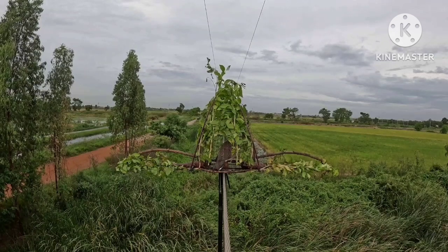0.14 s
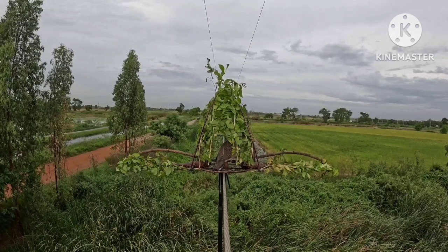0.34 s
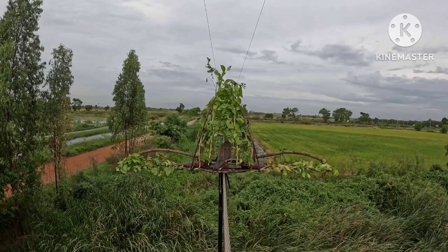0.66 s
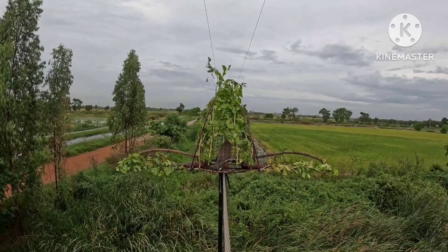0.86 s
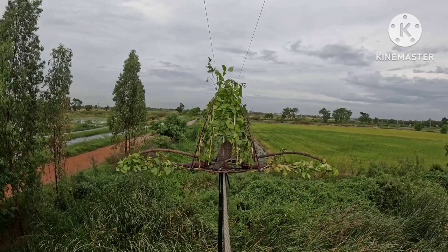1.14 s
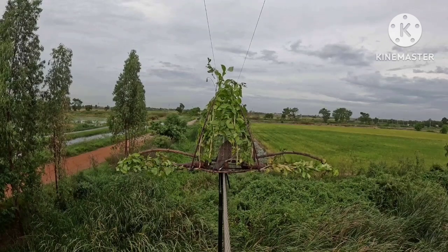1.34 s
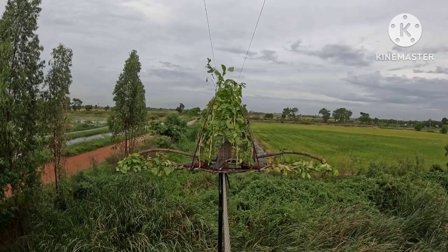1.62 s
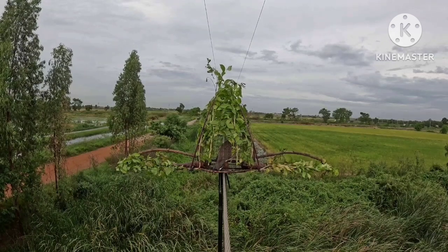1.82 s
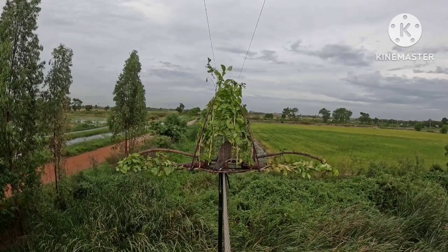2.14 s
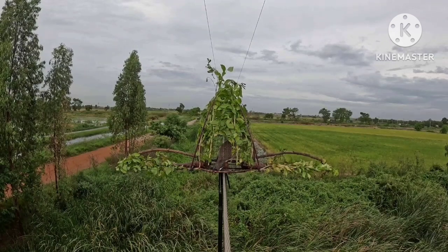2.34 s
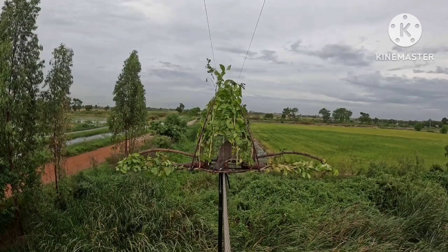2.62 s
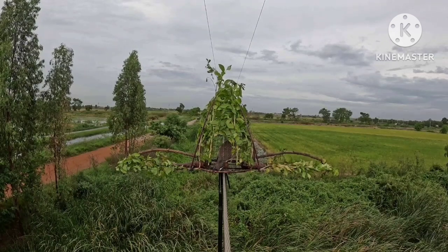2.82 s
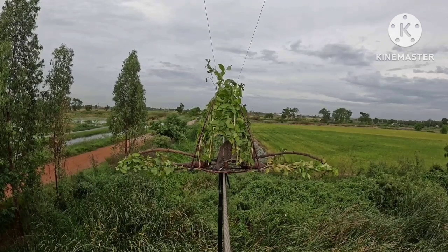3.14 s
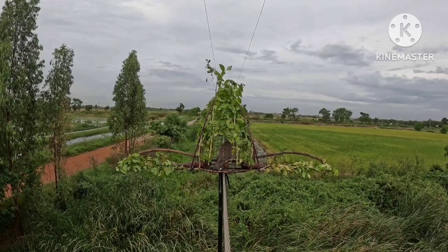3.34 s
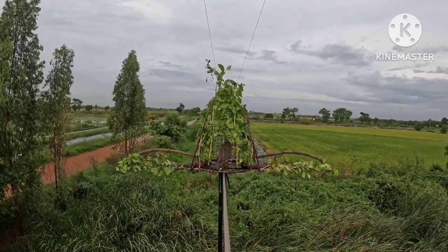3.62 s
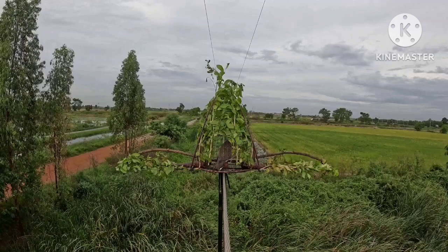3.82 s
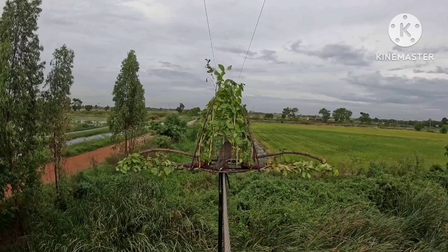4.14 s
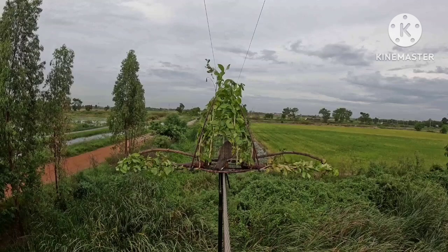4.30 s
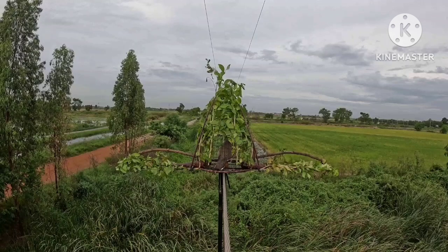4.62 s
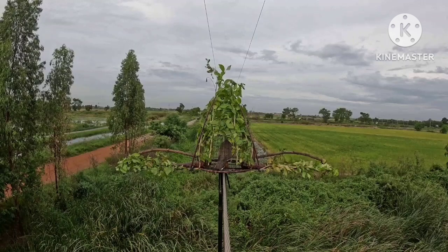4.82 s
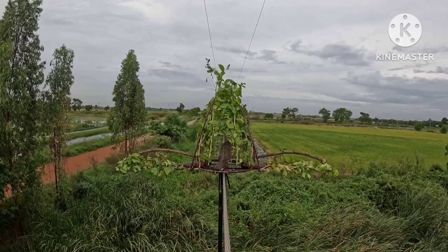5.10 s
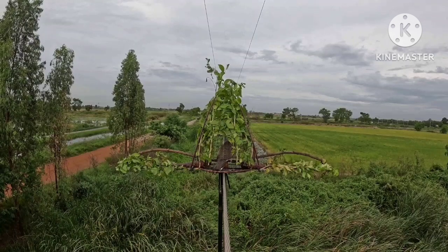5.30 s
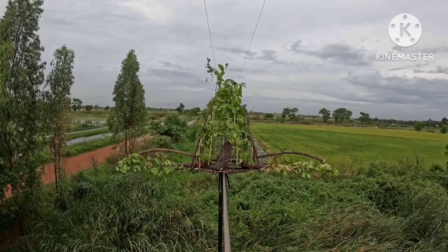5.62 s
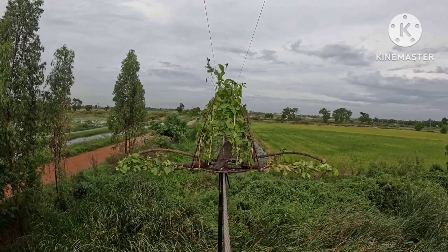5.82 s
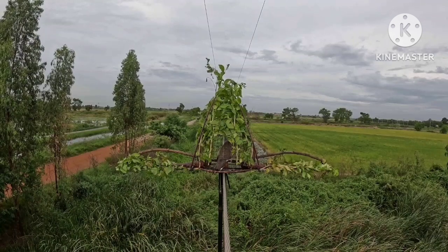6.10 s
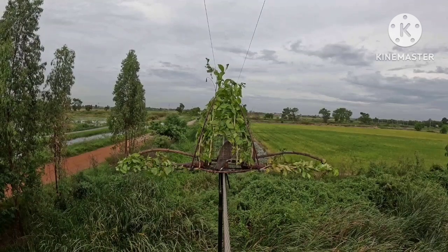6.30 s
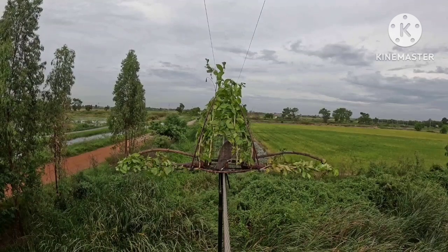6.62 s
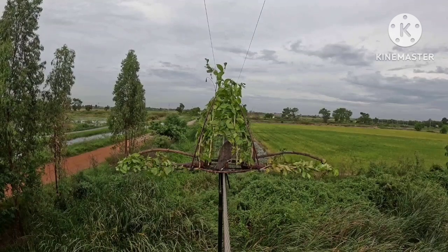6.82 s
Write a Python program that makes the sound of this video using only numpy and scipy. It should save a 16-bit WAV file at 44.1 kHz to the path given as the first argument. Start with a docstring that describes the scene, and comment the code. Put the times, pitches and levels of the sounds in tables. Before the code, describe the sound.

Outdoors at the edge of open farmland, wind rumbles and thumps unevenly against the microphone. From about 1.6 s a close dove gives a pip, an arched hollow coo, a quickening roll that sinks away, and a low closing coo. Buffets crowd together near 4 s, then ease. At 5.5 s the dove repeats its pip, coo and roll. Faint insects, small birds and a distant motor hum continue behind.

```python
"""Gusts buffet the microphone at the edge of open fields, over insects, small birds and a motor's hum.
At 1.6 s a spotted dove close by sounds a short pip, an arched coo, a quickening, sinking roll, then a
low closing coo; buffets crowd from 3.5 s to 4.2 s and ease; at 5.5 s the dove repeats pip, coo and roll.
The dove is a nearly pure tone whose level is shaped along with its pitch; wind, field and insect chorus
are filtered noise, the hum is a set of wavering sines, and the birds are gliding tones."""
import sys
import numpy as np
from scipy import signal
from scipy.fft import rfft, irfft, next_fast_len
from scipy.io import wavfile
from scipy.ndimage import uniform_filter1d

SR = 44100
rng = np.random.default_rng(int(sys.argv[2]) if len(sys.argv) > 2 else 0)


def transcribe(signal):
    """Save signal, clipped to [-1, 1], as a 16-bit WAV file at the path in sys.argv[1]."""
    frames = np.atleast_2d(signal).T
    limited = np.clip(frames, -1, 1)
    pcm = np.round(limited * 32767).astype(np.int16)
    wavfile.write(sys.argv[1], SR, pcm)


N = 306476
TIME = np.arange(N) / SR  # s


def gain_of(db):
    """Logarithmic level: 20 dB is a tenfold amplitude."""
    return 10 ** (np.asarray(db) / 20)


def evened(x):
    """Normalisation of power: scales to an rms of 1."""
    return x / np.sqrt(np.mean(x ** 2) + 1e-20)


def read(points, hz):
    """Interpolation of (frequency, value) points along a log-frequency axis."""
    f, value = np.transpose(points)
    return np.interp(np.log(hz + 1), np.log(f + 1), value)


def add(mix, start_s, sound):
    """Superposition: adds a sound into the mix in place."""
    part = mix[max(round(start_s * SR), 0):][:len(sound)]
    part += sound[:len(part)]


def noise(spectrum):
    """Spectral shaping of white noise, to an rms of 1."""
    size = next_fast_len(N)
    shape = gain_of(read(spectrum, np.fft.rfftfreq(size, 1 / SR)))
    white = rfft(rng.standard_normal(size))
    return evened(irfft(white * shape, size)[:N])


def drift(rate_hz):
    """Low-pass random modulation: noise of rms 1 under a Gaussian roll-off set by the rate."""
    size = next_fast_len(N)
    fade = np.exp(-(np.fft.rfftfreq(size, 1 / SR) / rate_hz) ** 2)
    return evened(irfft(rfft(rng.standard_normal(size)) * fade, size)[:N])


def placed(x, left_db):
    """Interaural level difference: the left side exceeds the right by left_db."""
    return x * gain_of([[left_db / 2], [-left_db / 2]])


SCATTER_T60_S = .3  # time for the scatter to fall by 60 dB


def outdoors(x, t60_s, first_s):
    """Diffuse scattering from trees and ground: sparse taps that die away, other ones on each side."""
    t = np.arange(SR // 2) / SR
    taps = rng.standard_normal((2, len(t))) * (rng.random((2, len(t))) < .05)
    taps *= (t > first_s) * gain_of(-60 * t / t60_s)
    return signal.oaconvolve(x[None], taps / np.linalg.norm(taps[0]), axes=1)[:, :N]


def ports(pair, lead):
    """Interchannel phase: two microphone ports hear the same sound slightly out of step."""
    size = next_fast_len(N)
    turn = np.exp(.5j * read(lead, np.fft.rfftfreq(size, 1 / SR)))
    return irfft(rfft(pair, size) * np.array([turn, turn.conj()]), size)[:, :N]


# lines of the distant motor's hum: pitch_hz [Hz], level_db [dB rms, before the waver]
HUM_LINES = [(49.8, -40.5), (63.3, -45), (99.8, -57), (183, -52.5), (353, -69)]


def motor(waver_db=1.25, wander_rad=.097):
    """Additive synthesis: low lines waver in level and phase on their way across the fields."""
    hum = np.zeros(N)
    for pitch_hz, level_db in HUM_LINES:
        level = gain_of(level_db + waver_db * drift(2))
        hum += level * np.sin(2 * np.pi * pitch_hz * TIME + wander_rad * drift(2))
    return np.sqrt(2) * hum


# spectrum of the far countryside: frequency_hz [Hz], density_db [relative dB per Hz]
FIELD_SPECTRUM = [(8, -2.5), (25, 3.5), (70, -1), (130, -6), (200, -13), (320, -15.5), (500, -13),
                  (800, -7), (1400, -12.5), (2400, -26), (3300, -31.3), (4900, -35), (6200, -39.5),
                  (9000, -39.5), (10500, -56.5), (15000, -71.5)]
# course of the wash: time_s [s], level_db [dB, before the wash trim]
FIELD_COURSE = [(0, -45.5), (.7, -43.5), (1.1, -41), (1.4, -42), (1.8, -44.3), (2.6, -43), (3.2, -41.5),
                (3.8, -42.5), (4.4, -42.5), (5.3, -43), (6.3, -41.5), (6.95, -41.5)]
# the field between the ears: frequency_hz [Hz], likeness [correlation], left_over_right_db [dB]
FIELD_WIDTH = [(60, .93, 0), (330, .95, 0), (1000, .92, -2.5), (2300, .76, -2.3), (4600, .6, 0),
               (7200, .7, 2), (9500, .6, 1.5)]


def field(patchy_db=1.3, wash_db=.2):
    """Partially coherent noise: far traffic and leaves as a stereo wash with drifting spectral patches."""
    frames, hz = N // 512 + 5, np.fft.rfftfreq(2048, 1 / SR)
    a, b, c, d, patches = rng.standard_normal((5, frames, len(hz)))
    patches = uniform_filter1d(uniform_filter1d(patches, size=10, axis=0), size=18, axis=1)
    patches = evened(patches) * (hz > 2500) * (hz < 6500)
    width = np.array(FIELD_WIDTH)
    likeness = np.clip(read(width[:, :2], hz), -1, 1)
    left_db = read(width[:, ::2], hz)
    # the right side shares only the coherent part of the left
    left = a + 1j * b
    right = likeness * left + np.sqrt(1 - likeness ** 2) * (c + 1j * d)
    pair = np.array([left * gain_of(left_db / 2), right * gain_of(-left_db / 2)])
    pair = pair * gain_of(read(FIELD_SPECTRUM, hz) + patchy_db * patches)
    wash = signal.istft(pair.transpose(0, 2, 1), nperseg=2048, noverlap=1536)[1][:, :N]
    return gain_of(np.interp(TIME, *np.transpose(FIELD_COURSE)) + wash_db) * evened(wash)


# spectrum of the steady insect chorus: frequency_hz [Hz], density_db [relative dB per Hz]
CHORUS_SPECTRUM = [(6000, -47), (6650, -21.5), (6900, -6), (7030, -4.5), (7150, -3.5), (7300, 0),
                   (7450, -5.5), (7650, -24.5), (8300, -52)]
# bouts of one nearer insect: start_s [s], length_s [s]
BUZZ_BOUTS = [(0, 0.12), (0.207, 0.23), (1.987, .18), (2.294, .2), (2.612, 0.22), (4.007, 0.16),
              (4.276, 0.19), (4.578, 0.25), (6.194, .17), (6.49, .18), (6.85, .15)]


def insects(chorus_db=-59.3, buzz_db=-64, buzz_hz=7600, strokes_hz=105):
    """Narrow-band noise and amplitude modulation: a shrill chorus, and one insect's wing-stroke buzzes."""
    chorus = noise(CHORUS_SPECTRUM) * gain_of(chorus_db + 1.0 * drift(70))
    bouts = np.zeros(N)
    for start_s, length_s in BUZZ_BOUTS:
        add(bouts, start_s, signal.windows.tukey(round(length_s * SR), .6))
    strokes = (1 + np.sin(2 * np.pi * strokes_hz * TIME)) * drift(210)
    buzz = gain_of(buzz_db) * bouts * evened(strokes * np.sin(2 * np.pi * buzz_hz * TIME))
    # independent noise on each side: insects all around
    spread = gain_of(chorus_db - 5.5) * np.array([noise(CHORUS_SPECTRUM), noise(CHORUS_SPECTRUM)])
    return placed(chorus, left_db=2.5) + spread + placed(buzz, left_db=5.5)


CHIP_S, CHIP_FALL = .028, .25  # length in s; depth of the dive as a share of the pitch


def chip(hz, bend):
    """Frequency glide: one quick whistle starts level and soft, then swells as it dives."""
    u = np.linspace(0, 1, round(CHIP_S * SR))
    pitch_hz = hz * (1 + CHIP_FALL * bend * (.3 - u ** 2.1))
    return np.sin(np.pi * u ** 1.4) ** 1.4 * np.sin(2 * np.pi * np.cumsum(pitch_hz) / SR)


RASP_ATTACK_S = .003
STUTTER_HZ, STUTTER_SWEEP = 130, .3  # rate of the tiny falling chirps; sweep as a share of the pitch


def rasp_syllable(start_s, length_s, first_hz, last_hz, roughness, roughening):
    """Sawtooth frequency modulation: a harsh syllable is a string of tiny falling chirps."""
    t = np.arange(start_s, start_s + length_s, 1 / SR)
    sweeps = 1 + STUTTER_SWEEP * roughness * (.5 - (t - start_s) * STUTTER_HZ % 1)
    pitch_hz = np.linspace(first_hz, last_hz, len(t)) * sweeps
    tone = np.sin(2 * np.pi * np.cumsum(pitch_hz) / SR)
    envelope = np.minimum((t - start_s) / RASP_ATTACK_S, 1) * (1 - ((t - start_s) / length_s) ** 2)
    grain = 1 - roughness + roughness * np.interp(t, TIME, roughening)
    return envelope * evened(tone * grain)


# runs of falling chips from one small bird: start_s [s], chips [count]
CHIP_RUNS = [(.202, 4), (.658, 2), (1.675, 3), (1.968, 2), (2.85, 3), (3.077, 3), (3.269, 3), (3.495, 3),
             (3.688, 3), (3.915, 3), (6.868, 2)]
CHIP_SPACING_S, RUN_HZ, RUN_DB = .0375, 4760, -55.5  # pitch and level before each chip's variation
# single peeps of other birds: start_s [s], pitch_hz [Hz, before the bend], level_db [dB, before the trim]
BIRD_PEEPS = [(.468, 4550, -54.5), (.569, 5800, -56), (.789, 5200, -56), (1.388, 5700, -58),
              (1.459, 5750, -58), (1.965, 3450, -56), (2.008, 3000, -56), (2.047, 3550, -56),
              (2.06, 2700, -55), (2.38, 5600, -56), (2.451, 5700, -55), (3.256, 3150, -54),
              (3.309, 4450, -54), (3.4, 5700, -59), (3.912, 2900, -56), (4.213, 5600, -58),
              (4.355, 3050, -57), (4.288, 5300, -58), (4.558, 3400, -57), (6.15, 3300, -56),
              (6.53, 3200, -56), (6.724, 3150, -54)]
# raspy syllables: start_s [s], length_s [s], first_hz [Hz], last_hz [Hz],
# level_db [dB, before the trim and envelope], roughness [0-1]
RASP_SYLLABLES = [(.509, .018, 6100, 4200, -53, .4), (.529, .018, 5700, 4300, -51, .35),
                  (.546, .022, 5500, 4000, -51, .35), (.65, .07, 4000, 3500, -60, .9),
                  (1.856, .016, 5500, 6400, -50, .4), (1.864, .03, 5700, 4500, -51, .55),
                  (1.866, .035, 3600, 3300, -53, .35), (1.885, .045, 4500, 3500, -58, .9),
                  (1.885, .05, 5000, 5600, -56, 1), (2.454, .022, 4400, 3200, -55, .6),
                  (2.495, .06, 5350, 5150, -60, .55), (3.285, .07, 4900, 5200, -59, .9),
                  (4.37, .09, 3200, 4500, -61, .7), (4.4, .07, 5200, 5100, -62, .8),
                  (5.594, .05, 5500, 4000, -58, .7), (5.612, .05, 5100, 3500, -56.5, .65),
                  (5.645, .07, 4200, 3200, -57.5, .7)]


def small_birds(first_chip_db=-3.5, peep_db=-1.5, rasp_db=-1.5, rasp_width_hz=550,
                twitter_db=-67.5, twitter_hz=3700, twitter_spread=.27, ragged_db=2):
    """Superposed gliding tones: far runs, peeps, harsh stuttering calls and faint scattered twittering."""
    song = np.zeros(N)
    roughening = drift(rasp_width_hz)
    for start_s, count in CHIP_RUNS:
        for k, (pitch, bend) in enumerate(rng.uniform(-1, 1, (round(count), 2))):
            level = gain_of(RUN_DB + first_chip_db * (k == 0))
            whistle = chip(RUN_HZ * (1 + .02 * pitch), 1 + .2 * bend)
            add(song, start_s + k * CHIP_SPACING_S, level * whistle)
    for start_s, pitch_hz, level_db in BIRD_PEEPS:
        add(song, start_s, gain_of(level_db + peep_db) * chip(pitch_hz, .7))
    for when, pitch, bend, loud in rng.random((140, 4)):
        pitch_hz = twitter_hz * (1 + twitter_spread * (2 * pitch - 1))
        add(song, when * N / SR, gain_of(twitter_db + 4 * loud) * chip(pitch_hz, .5 + bend))
    song *= evened(gain_of(ragged_db * drift(300)))  # ragged level, on the whistles only
    for start_s, length_s, first_hz, last_hz, level_db, roughness in RASP_SYLLABLES:
        syllable = rasp_syllable(start_s, length_s, first_hz, last_hz, roughness, roughening)
        add(song, start_s, gain_of(level_db + rasp_db) * syllable)
    return placed(song, left_db=2) + gain_of(-1.5) * outdoors(song, SCATTER_T60_S, first_s=.007)


def eddies(spectrum):
    """Automatic gain: turbulence whose short-term strength is held near 1."""
    x = noise(spectrum)
    return x / np.sqrt(uniform_filter1d(x ** 2, size=1500) + 0.055)


BUFFET_SHAPE_HZ, BUFFET_EDGE_SPEED = 150, .65  # pitch of the unshifted spectrum; relative speed at the edges


def buffet(turbulence, length_s, hz):
    """Time-scaled turbulence: one striking eddy spins fastest, and sounds brightest, at its height."""
    swell = signal.windows.tukey(round(length_s * SR), .9)
    speed = hz / BUFFET_SHAPE_HZ * (BUFFET_EDGE_SPEED + (1 - BUFFET_EDGE_SPEED) * swell)
    eddy = np.interp(rng.uniform(0, N / 2) + np.cumsum(speed), np.arange(N), turbulence)
    return evened(swell * eddy) * np.sqrt(np.mean(swell ** 2))


# spectra of slow eddies, of fast eddies, of the smallest eddies torn off by a strong gust, of the
# breeze that never stops, and of a buffet before its pitch shift:
# frequency_hz [Hz], density_db [relative dB per Hz]
SLOW_SPECTRUM = [(6, -11), (20, 4), (45, -0.5), (75, 3.5), (110, -8), (160, -19), (250, -31), (400, -41),
                 (800, -62), (2000, -84.5)]
FAST_SPECTRUM = [(15, -19.5), (60, -7), (110, 7), (180, -1.5), (250, -12.5), (360, -22.5), (550, -37),
                 (900, -56), (2000, -83), (6000, -120)]
TEARING_SPECTRUM = [(60, -25), (150, -4), (230, 0), (330, -7), (450, -12), (650, -27), (1500, -65),
                    (6000, -120)]
BREEZE_SPECTRUM = [(10, -1), (28, 1.5), (55, -1), (80, -4), (120, -6.5), (190, -6.5), (260, -17),
                   (400, -32), (1000, -63.5)]
BUFFET_SPECTRUM = [(20, -28), (60, -8), (115, 0), (200, -5.5), (280, -13.5), (400, -24), (600, -41),
                   (1500, -85), (6000, -130)]
# strength of the wind: time_s [s], slow_db [dB, before trim and lumps], fast_db [likewise]
WIND_COURSE = [(0, -32, -38), (.25, -27, -42), (.34, -52, -54), (.66, -40, -41), (.82, -24, -37),
               (1.15, -36, -50), (1.26, -25.5, -32), (1.52, -29, -30), (1.75, -32, -34), (2.18, -25.5, -29),
               (2.42, -41, -50), (2.85, -37, -48), (3.22, -27, -34), (3.44, -38, -45), (3.7, -26.5, -24.5),
               (4.12, -26.5, -26), (4.5, -36, -51), (5.1, -40, -57)]
# hardest buffets: middle_s [s], length_s [s], pitch_hz [Hz at the height], level_db [dB before placing]
WIND_BUFFETS = [(.15, .06, 85, -32), (.243, .05, 110, -26), (.84, .07, 70, -25.5), (.915, .03, 115, -19),
                (.932, .022, 185, -18), (.975, .024, 145, -23), (1.063, .026, 120, -23),
                (1.245, .045, 90, -25), (1.439, .028, 180, -17.5), (1.483, .026, 225, -19.5),
                (1.518, .024, 230, -16.5), (1.575, .016, 150, -23), (2.055, .05, 135, -22),
                (2.135, .05, 130, -26), (2.619, .036, 95, -23), (2.925, .045, 140, -22),
                (3.095, .045, 110, -25), (3.275, .05, 90, -22), (3.568, .018, 200, -26),
                (3.614, .02, 130, -25), (3.66, .03, 115, -22), (3.697, .022, 165, -23),
                (3.719, .03, 155, -18), (3.772, .03, 165, -17), (3.789, .02, 195, -19),
                (3.808, .024, 165, -20), (3.827, .024, 170, -19), (3.863, .022, 170, -18),
                (3.882, .022, 205, -23), (3.92, .028, 125, -20), (3.944, .02, 175, -24),
                (3.972, .022, 145, -22), (3.997, .028, 155, -20), (4.05, .024, 150, -19),
                (4.069, .028, 140, -19), (4.129, .016, 190, -26), (4.16, .024, 190, -19),
                (4.193, .034, 180, -20), (4.413, .05, 125, -23)]


def wind(slow_db=-2, fast_db=-4.5, buffet_db=0, breeze_db=-43.5, tearing_db=-10.5,
         lumps_db=2, lumps_hz=13):
    """Turbulent pressure: lumpy slow and fast eddies on the microphone ports, and sudden thumping buffets."""
    time_s, *columns = np.transpose(WIND_COURSE)
    lumps = lumps_db * drift(lumps_hz)
    slow, fast = (gain_of(np.interp(TIME, time_s, column) + lumps) for column in columns)
    buffets, turbulence = np.zeros(N), noise(BUFFET_SPECTRUM)
    for middle_s, length_s, pitch_hz, level_db in WIND_BUFFETS:
        thump = gain_of(level_db + buffet_db) * buffet(turbulence, length_s, pitch_hz)
        add(buffets, middle_s - length_s / 2, thump)
    rumble = placed(gain_of(slow_db) * slow * eddies(SLOW_SPECTRUM), left_db=-4.3)
    flutter = placed(gain_of(fast_db) * fast * eddies(FAST_SPECTRUM) + buffets, left_db=-7.5)
    # the square makes tearing grow faster than the gust
    tearing = gain_of(tearing_db) * fast ** 2 / fast.max() * noise(TEARING_SPECTRUM)
    # eddies that reach one port only
    unshared = gain_of(-12.5) * slow * np.array([noise(SLOW_SPECTRUM), noise(SLOW_SPECTRUM)])
    breeze = gain_of(breeze_db + 2 * drift(8)) * noise(BREEZE_SPECTRUM)
    return rumble + flutter + placed(tearing, left_db=-8) + unshared + breeze


# the dove's partials: multiple [of the fundamental], level_db [dB]
DOVE_PARTIALS = [(1, -0.5), (2, -42), (3, -52.5)]


def syrinx(hz):
    """Harmonic filtering: the inflated throat passes little but the fundamental."""
    phase = 2 * np.pi * np.cumsum(hz) / SR
    return sum(gain_of(level_db) * np.sin(multiple * phase) for multiple, level_db in DOVE_PARTIALS)


def soft_gate(t, length_s):
    """Logistic amplitude gating: the syrinx opens and shuts softly."""
    outside_s = abs(t - length_s / 2) - length_s / 2 + .004
    return 1 / (1 + np.exp(np.minimum(outside_s / .0011, 50)))


FULL_PIP_S = .04  # a puff this long arches fully


def pip(start_s, length_s, hz, level_db, sag=.21):
    """Coupled pitch and level: a puff arches, less when short; every note gives (start s, Hz, gain)."""
    t = np.arange(-.005, length_s + .005, 1 / SR)
    arch = np.clip(2 * (t / length_s - .57), -1.05, 1.05) ** 2
    dip = sag * (length_s / FULL_PIP_S) ** 1.4 * arch
    gain = gain_of(level_db + .5 - 13 * dip) * soft_gate(t, length_s)
    return start_s + t[0], hz * (1 - dip), gain


GRACE_S, GRACE_SINK_HZ_PER_S, GRACE_FADE_DB_PER_S = .035, 600, 260


def grace_note(start_s, hz, level_db):
    """Exponential decay: a faint low note sinks and fades at once."""
    t = np.arange(0, GRACE_S, 1 / SR)
    gain = gain_of(level_db - GRACE_FADE_DB_PER_S * t) * signal.windows.tukey(len(t), .7)
    return start_s, hz - GRACE_SINK_HZ_PER_S * t, gain


# a coo scoops up from a lower, softer shelf and drops back to it
SCOOP_S, DROP_S, SHELF_HZ, SHELF_DB = .026, .009, 572, -8.3  # shelf level relative to the top


def coo(start_s, length_s, attack_s, hold_s, hz, level_db, sink_hz=32):
    """Pressure control: it rises, holds and drops to a shelf; level follows, and the held pitch sags."""
    t = np.arange(0, length_s, 1 / SR)
    rise = np.clip((t - attack_s / 2) / SCOOP_S, 0, 1)
    held = 1 / (1 + np.exp((t - hold_s) / DROP_S))
    slack = 1 - rise * held
    top_hz = hz - sink_hz * (t / hold_s) ** 3
    gate = np.minimum(t / attack_s, 1) * soft_gate(t, length_s)
    return start_s, top_hz + (SHELF_HZ - top_hz) * slack, gain_of(level_db + SHELF_DB * slack ** 2) * gate


QUICKEN, FASTEST_S = .96, .016  # ratio of each spacing to the last; closest spacing
MERGE_FROM_S, MERGE_S, MERGED_SHARE = .05, .13, .7  # the weakening pulses run together into one tone
# course of a trill: time_s [s from its start], pitch_hz [Hz, before sag and jitter],
# level_db [dB, before the roll's level and roughness]
TRILL_COURSE = [(0, 608, -17.3), (.07, 563, -21.3), (.13, 540, -26), (.21, 490, -33.5), (.265, 440, -41),
                (.3, 458, -38.5), (.33, 440, -42)]


def roll(start_s, length_s, first_s, level_db, sag=.03, rough_db=1.1, jitter=.012, count=30):
    """Pulse-train modulation: quickening pulses run together, sink and grow uneven as they weaken."""
    t = np.arange(0, length_s, 1 / SR)
    spacings_s = np.maximum(first_s * QUICKEN ** np.arange(count), FASTEST_S)
    onsets = np.append(0, np.cumsum(spacings_s))
    puff = np.sin(np.pi * np.interp(t, onsets, np.arange(count + 1))) ** 2
    merged = np.clip((t - MERGE_FROM_S) / MERGE_S, 0, 1)
    when, *columns = np.transpose(TRILL_COURSE)
    hz, course_db = (np.interp(t, when, column) for column in columns)
    hz = hz * (1 + sag * (puff - .7) + jitter * merged * drift(90)[:len(t)])
    gate = 1 - (1 - MERGED_SHARE * merged) * (1 - puff) ** 1.5
    level = gain_of(level_db + course_db + rough_db * merged * drift(70)[:len(t)])
    return start_s, hz, level * gate * signal.windows.tukey(len(t), .04)


CLOSING_RISE_S, CLOSING_RANGE_DB, CLOSING_HZ_PER_DB = .06, 21.5, 6.8


def closing_coo(start_s, length_s, hz, level_db, curve=1.95):
    """Pitch proportional to level: a quick swell and a long sigh."""
    t = np.arange(0, length_s, 1 / SR)
    slack = np.interp(t, [0, CLOSING_RISE_S, length_s], [1, 0, 1])
    down_db = CLOSING_RANGE_DB * slack ** curve
    return start_s, hz - CLOSING_HZ_PER_DB * down_db, gain_of(level_db - down_db) * soft_gate(t, length_s)


# The dove's notes; pitches before the waver, levels before flutter and placing.
# pips opening a phrase and first pulses of each roll:
# start_s [s], length_s [s], top_hz [Hz], level_db [dB, before the pip's own trim]
DOVE_PIPS = [(1.623, .04, 675, -17.5), (2.346, .033, 700, -16.6), (2.402, .03, 705, -16.8),
             (2.452, .029, 688, -16.3), (2.495, .026, 675, -16.4), (2.534, .027, 655, -16.4),
             (2.567, .027, 640, -15.4), (5.489, .043, 686, -17), (6.216, .034, 710, -17),
             (6.271, .03, 712, -16.4), (6.319, .019, 632, -16.4), (6.343, .028, 680, -15.7),
             (6.39, .026, 650, -15.6), (6.42, .024, 606, -18.3), (6.445, .025, 610, -17.3)]
# soft grace notes: start_s [s], pitch_hz [Hz at the start], level_db [dB at the start]
DOVE_GRACE_NOTES = [(1.757, 475, -35.5), (1.87, 505, -32), (5.618, 465, -36), (5.729, 495, -35.5)]
# arched coos: start_s [s], length_s [s], attack_s [s], hold_s [s until the pitch drops],
# top_hz [Hz, before the sag], level_db [dB]
DOVE_COOS = [(1.951, .215, .008, .161, 685, -15.3), (5.818, .213, .016, .151, 689, -14.3)]
# trills in which each roll dies away: start_s [s], length_s [s], first_spacing_s [s],
# level_db [dB added to the trill's course]
DOVE_ROLLS = [(2.5965, .33, .023, .5), (6.471, .315, .0235, -.5)]
# low closing coo of the first phrase, a single row: start_s [s], length_s [s], top_hz [Hz], level_db [dB]
DOVE_CLOSING_COO = (3.115, .25, 573, -19.4)


def dove(waver=.003, flutter_db=.48):
    """Source and reflection: one slightly unsteady voice sounds every note, with echo and scatter."""
    voice, pitch_waver = np.zeros(N), 1 + waver * drift(88)
    kinds = [(pip, DOVE_PIPS), (grace_note, DOVE_GRACE_NOTES), (coo, DOVE_COOS),
             (roll, DOVE_ROLLS), (closing_coo, [DOVE_CLOSING_COO])]
    for note, rows in kinds:
        for row in rows:
            start_s, hz, gain = note(*row)
            waver_now = np.interp(start_s + np.arange(len(hz)) / SR, TIME, pitch_waver)
            add(voice, start_s, gain * syrinx(hz * waver_now))
    voice *= gain_of(flutter_db * drift(100))
    echo = gain_of(-22) * np.interp(TIME - .024, TIME, voice)  # a hard surface a few metres off
    scatter = gain_of(-20.5) * outdoors(voice, SCATTER_T60_S, first_s=.0099)
    return placed(voice + echo, left_db=-1.7) + scatter


# how far the left port leads the right, for field and wind: frequency_hz [Hz], lead_rad [radians]
FIELD_PORT_LEAD = [(200, 0), (1000, -.45), (2300, -.8), (3500, -.7), (4500, 0), (5100, .8), (5700, 0)]
WIND_PORT_LEAD = [(25, 0), (60, .15), (160, .5), (340, .9), (780, -.3)]


def scene():
    """Linear superposition: the dove in front of wind and countryside."""
    countryside = motor() + ports(field(), FIELD_PORT_LEAD) + insects() + small_birds()
    return countryside + ports(wind(), WIND_PORT_LEAD) + dove()


EDGE_HZ = 14000  # upper band limit


def record(dry):
    """Low-pass filtering: the recorder's band limit."""
    low_pass = signal.firwin(511, EDGE_HZ, window=("kaiser", 9), fs=SR)
    return signal.oaconvolve(dry, low_pass[None], "same")


dry = scene()
out = record(dry)
transcribe(out)
```